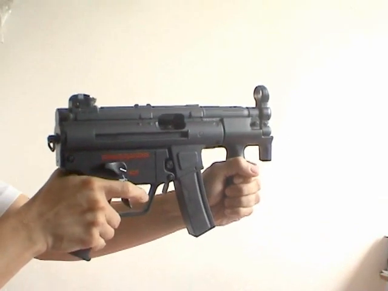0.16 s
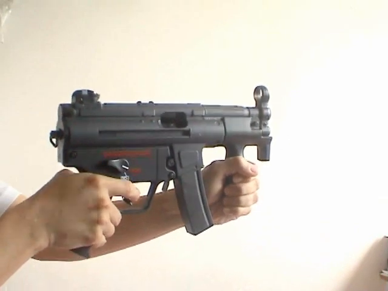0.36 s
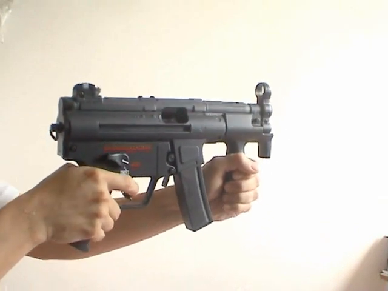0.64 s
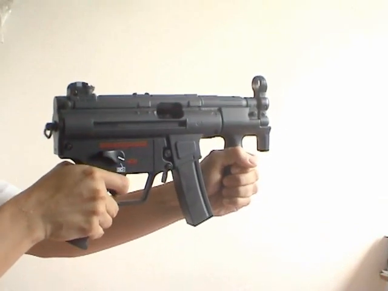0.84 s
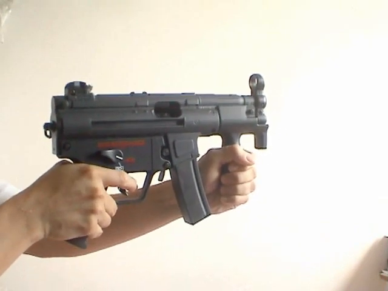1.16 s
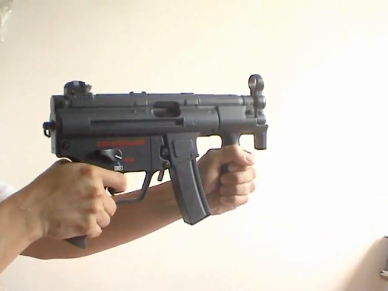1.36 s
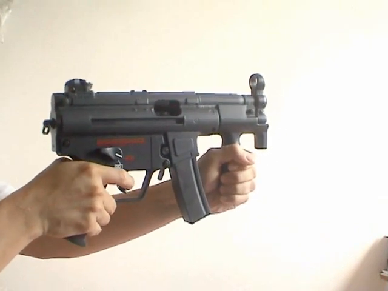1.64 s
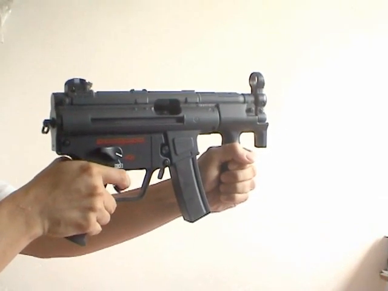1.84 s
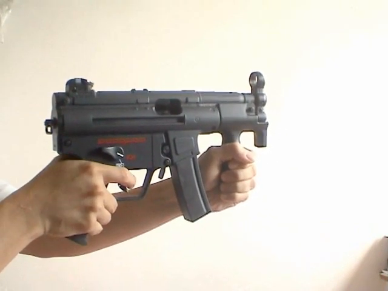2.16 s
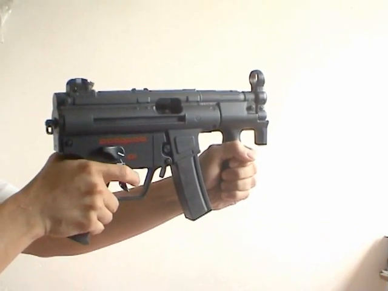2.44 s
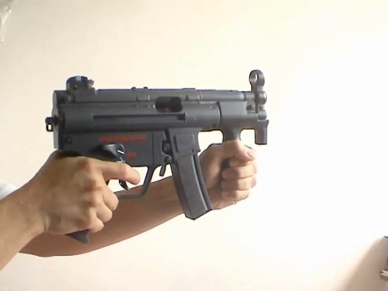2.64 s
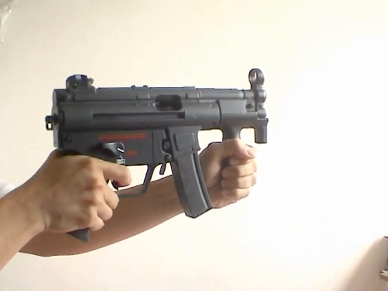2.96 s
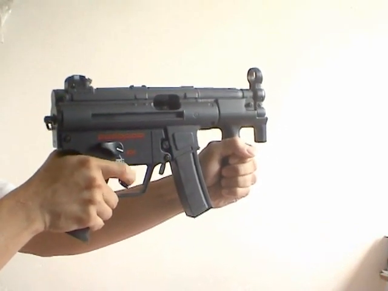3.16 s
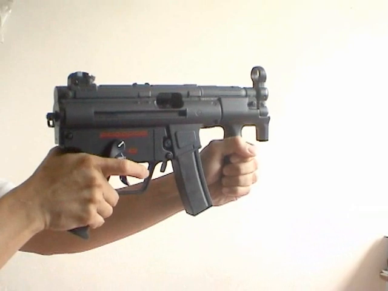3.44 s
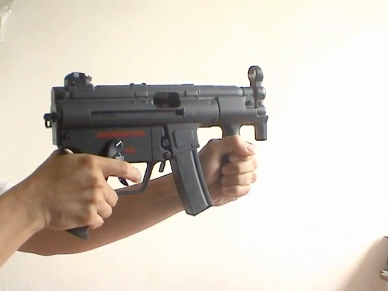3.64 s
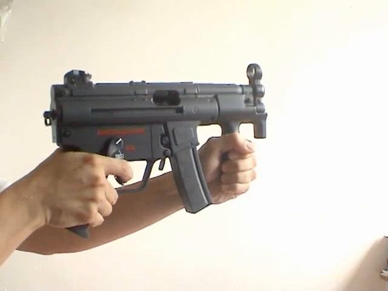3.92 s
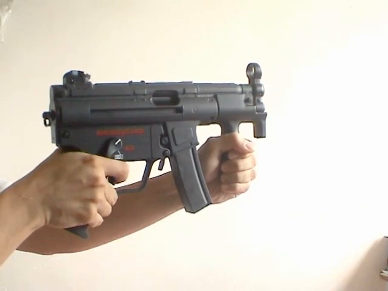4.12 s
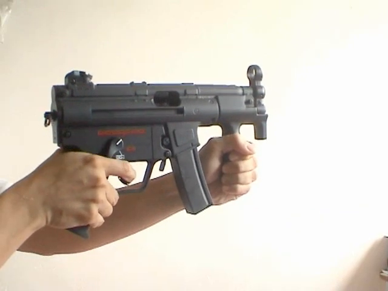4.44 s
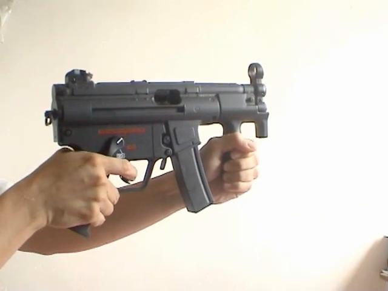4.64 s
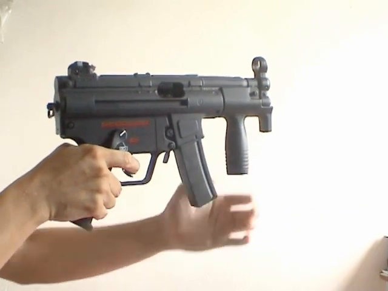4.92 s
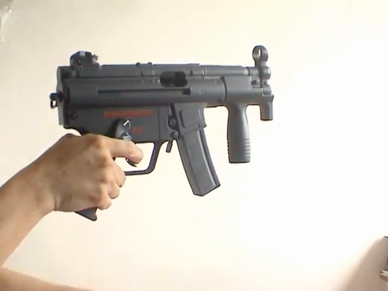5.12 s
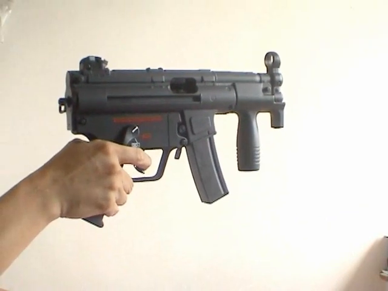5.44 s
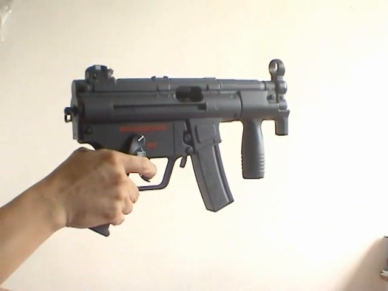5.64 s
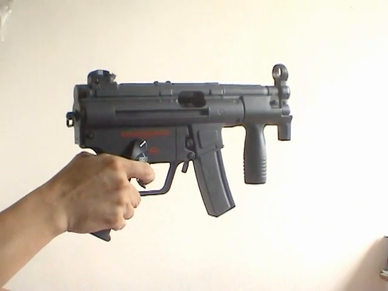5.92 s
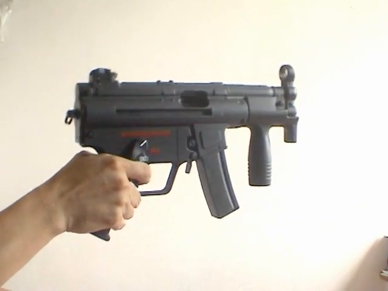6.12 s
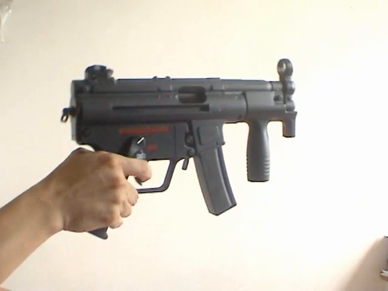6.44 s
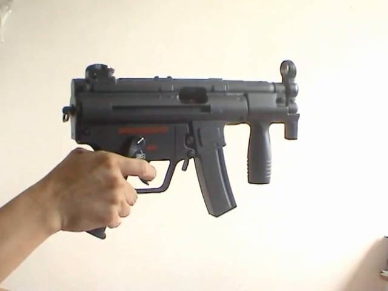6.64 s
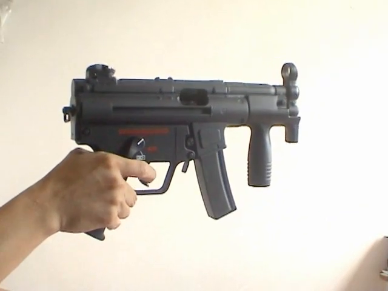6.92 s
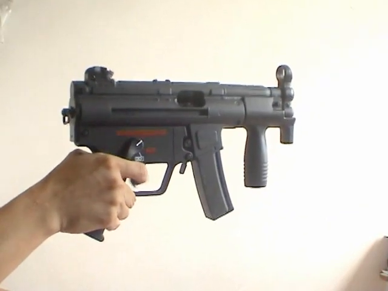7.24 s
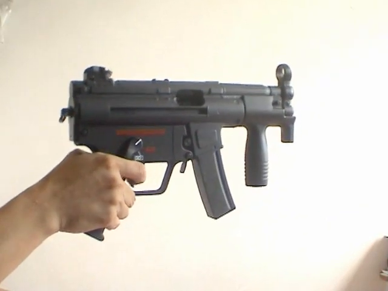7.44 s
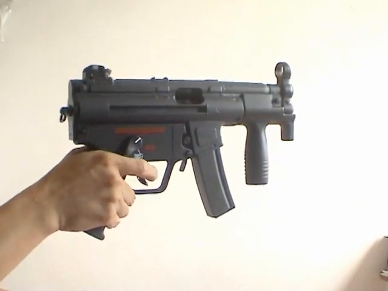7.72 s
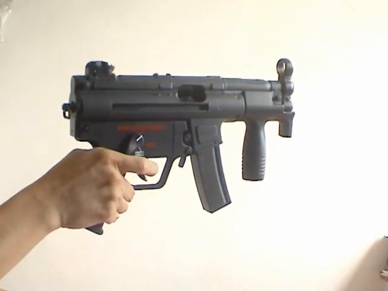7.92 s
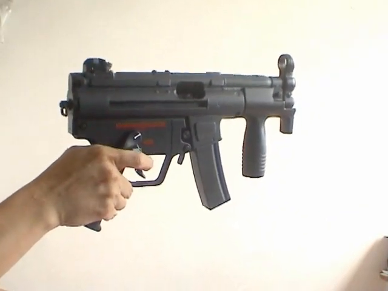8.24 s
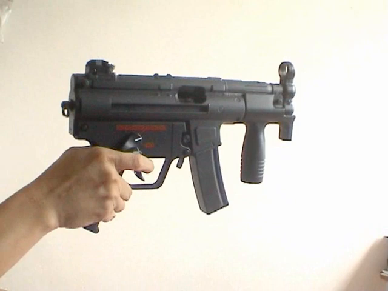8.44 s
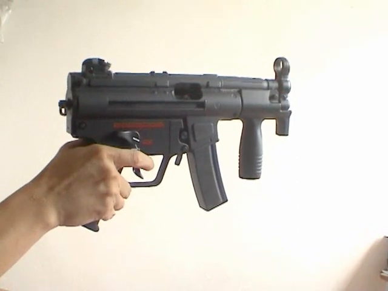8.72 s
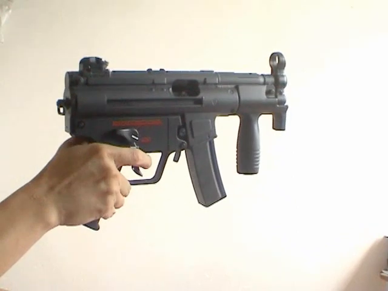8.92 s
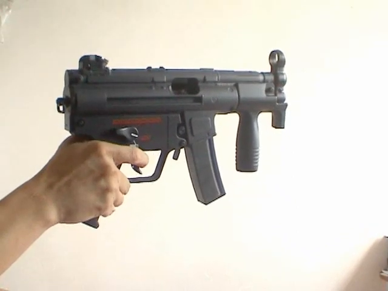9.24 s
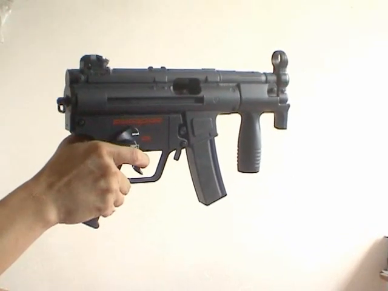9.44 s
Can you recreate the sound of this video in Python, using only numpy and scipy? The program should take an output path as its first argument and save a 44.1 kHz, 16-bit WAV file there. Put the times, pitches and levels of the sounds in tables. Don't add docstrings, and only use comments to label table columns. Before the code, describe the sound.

A gas-powered replica gun snaps four separate sharp shots, then three rapid automatic bursts, with plastic clicks between, over a low room drone.

```python
import sys
import numpy as np
from scipy import signal
from scipy.fft import rfft, irfft, next_fast_len
from scipy.io import wavfile
from scipy.ndimage import uniform_filter1d

SR = 44100
rng = np.random.default_rng(int(sys.argv[2]) if len(sys.argv) > 2 else 0)


def gain_from_decibels(decibels):
    exponent = np.asarray(decibels, float) / 20
    return 10 ** exponent


def materialize(psi):
    bounded = np.clip(np.atleast_2d(psi).T, -1, 1)
    quanta = np.round(bounded * 32767).astype(np.int16)
    wavfile.write(sys.argv[1], SR, quanta)


N = 422037
TIME = np.arange(N) / SR

# (frequency [Hz], density [dB per Hz])
AIR_SPECTRUM = [(12, -38), (24, -7), (60, -6), (130, -4.5), (240, -3), (370, -3.5), (660, -5), (1090, -10),
                (1600, -12), (3000, -19), (4050, -22.5), (4500, -27.5), (8000, -33.5), (14500, -41)]
# (frequency [Hz], width [Hz], level [dB])
HUM_BANDS = [(132, 22, 0.5), (325.7, 3.2, -2.5)]
# (frequency [Hz], level re air [dB])
WHINE_TONES = [(7800, -35), (13410, -40)]
# (time [s], length [s], level before gain control [dB])
MOTOR_SWELLS = [(.34, 0.06, -43), (2.64, 0.045, -47), (5.58, 0.07, -37), (6.02, 0.12, -32),
                (7.9, 0.14, -34), (8.31, 0.055, -32.5), (8.554, 0.058, -34.5), (9.46, 0.15, -39)]
# (time [s], level [dB])
TRIGGER_CLICKS = [(.6394, -37.5), (.846, -32.5), (0.879, -24), (1.4067, -26), (1.4262, -25),
                  (1.8015, -18.5), (2.7574, -44.5), (3.0143, -22.5), (3.033, -22.5), (3.9998, -32.5),
                  (6.0553, -32), (7.312, -44), (7.3484, -43.5), (9.442, -48)]
# (top re middle [dB], tail [dB], latch ring [dB])
TRIGGER_TONE = (-20, -9, -18)
# (time [s], level [dB], top re middle [dB], tail [dB], latch ring [dB])
SELECTOR_SNAPS = [
    (0.0572, -4.5, 0.5, -10, -24),
    (3.4752, -22.5, -14.5, -11.5, -23.5),
    (3.4814, -28.5, -7, -4.5, -16),
    (3.5144, -9.5, 5.5, -9.5, -19),
    (3.5185, -6.5, -17, -9.5, -12.5),
    (8.6872, -26.5, -5.5, -11, -19),
    (8.6902, -27.5, 0.5, -10.5, -17.5),
    (8.7134, -29.5, 7, -25.5, -19.5),
    (8.721, -29, 2.3, -4.5, -16),
]
# (frequency [Hz], level [dB], t60 [s])
LATCH_MODES = [(1217, -5, 0.14), (2310, -8, 0.021), (2600, -2, 0.028), (2860, -5, 0.22), (3210, -3, 0.081),
               (3980, -10.5, 0.17)]
# (time [s], frequency [Hz], level [dB], t60 [s])
KNOCKS = [(.0578, 1600, -11.5, 0.079), (8.688, 640, -36.5, 0.12), (8.701, 960, -40.5, 0.14),
          (8.724, 870, -43, 0.12), (8.6905, 2400, -35.5, .02), (3.5187, 2600, -4.5, .03),
          (3.532, 2900, -21, 0.046)]
# (valve opens [s], first thump [s], last thump [s])
PULLS = [
    (0.9341, 0.9578, 0.9578),
    (1.4887, 1.5122, 1.5122),
    (1.8649, 1.8886, 1.8886),
    (3.0995, 3.1237, 3.1237),
    (4.2395, 4.2624, 4.5213),
    (6.1072, 6.1311, 6.5761),
    (7.387, 7.411, 7.6335),
]
# (limited jet [dB], excess over limiter at last round [dB], hammer and valve [dB])
PULL_FORCE = [(-12.5, 15.5, 0.5), (-13, 14.5, -0.7), (-13.5, 13.5, 1.5), (-13.5, 14, -1), (-12, 7, -2.5),
              (-9.5, -2, -5.5), (-7.5, -6.5, -7)]
# (level [dB], lift at first thump [dB], extra fall [dB/s], dullness of first rush [dB])
LAYERS = [(0.3, 2.8, -3.4, 0.5), (-5, 3, 11.5, -6), (-1.5, -2, 12.5, -6.5), (-5, 4, 8.5, 3.5)]
# (frequency [Hz], density [dB per Hz])
BODY_SPECTRUM = [(90, -31), (135, -12.5), (165, -21.5), (210, -17), (320, -13.5), (431, -7.5), (549, -9),
                 (620, -7), (862, -4.5), (1100, -7), (1490, -6), (1800, -13.5), (2340, -41), (3960, -90.5)]
# (frequency [Hz], level [dB], t60 [s])
ROOM_MODES = [(217.8, -14.5, 0.23), (263.9, -10.5, 0.29), (279.4, -12, 0.35), (429, -13.5, 0.29),
              (476.3, 0.5, 0.13), (583, -9.5, 0.21), (729.2, -8, 0.38), (830, -14, 0.07),
              (847.5, -3.5, 0.38), (917, -1, 0.18), (1085, 0.5, 0.18), (1437, -6, .2)]
# (frequency [Hz], level [dB], t60 [s])
SLIDE_MODES = [(2940, -39.5, .3), (3020, -36, .35), (3360, -29.5, .25), (6400, -42, .25), (7950, -35, .4)]
# (frequency [Hz], density [dB per Hz])
GAS_SPECTRUM = [(710, -29), (1200, -4.5), (1400, 3.5), (1490, -9), (1860, 0.5), (2110, 1), (2290, 1.5),
                (2910, 0), (3300, 3), (3630, 2), (4610, -1), (8100, -1), (12800, -9.5), (13800, -13.5),
                (14500, -33.5)]
# (time after thump [s], level [dB])
JET_CYCLE = [(0, -2), (.002, 10), (.006, -13), (.009, 5.5), (.014, -1), (.019, -1.5), (.027, -0.5),
             (.037, 3.5)]
# (frequency [Hz], level [dB])
PORT_LEFT_DB = [(60, 7), (110, 10), (200, 7), (370, 7.5), (680, 4), (1250, 3), (2280, 1), (4190, -0.5),
                (7680, 0), (14100, 0.5)]
# (frequency [Hz], phase [rad])
PORT_LEAD_RAD = [(60, .1), (400, 0.45), (1200, 0.64), (3700, 0.36), (9000, 0.11)]
# (frequency [Hz], correlation [0-1])
PORT_ALIKE = [(60, 1), (130, 0.94), (290, 1), (620, 0.87), (1360, 0.71), (2960, 0.77), (6460, 0.63),
              (14100, 0.033)]

JET_MIDDLE, LOW_BODY, JET_TOP, UPPER_BODY = range(4)
AIR_DB, AIR_FADE_DB_PER_S, AIR_STEADY_S = -32, 0.63, 5.2
MOTOR_HZ, MOTOR_DB, THROB_DB = 80.2, -45, 3
SENSOR_DB = -71
CLICK_T60_S = 0.22
CYCLE_S, HURRY_S = .0371, .0007
UNLOCK_S, VENT_S = .0138, 0.018
CRACK_DB, RUSH_DB, HAMMER_DB = -6.5, -3.5, -19
THUMP_DB, FIRST_THUMP_DB, THUMP_SCATTER_DB = -4.5, -4, 0.1
SAG_DB_PER_S, SETTLE_DB, SETTLE_S, LIFT_S = 0.5, 1.5, .08, 0.014
ROOM_FALL_DB_PER_S, KNEE_DB = 178, 8
SINK_DB_PER_S = 59.5
LATE_DB, LATE_FALL_DB_PER_S = -42.5, 90.5
BOTTOM_DB, PULL_SHARE, WAIT_S, CREEP_DB_PER_S = -34, 0.033, 0.26, 4


def along(table, hz):
    f, v = np.transpose(table)
    return np.interp(np.log(hz + 1), np.log(f), v)


def colour(x, table):
    n = next_fast_len(x.shape[-1], True)
    hz = np.arange(n // 2 + 1) * SR / n
    y = irfft(rfft(x, n) * gain_from_decibels(along(table, hz)), n)[:, :x.shape[-1]]
    return y / np.sqrt(np.mean(y ** 2))


def band(x, lo_hz, hi_hz):
    sos = signal.butter(2, [lo_hz, min(hi_hz, SR / 2.2)], "band", fs=SR, output="sos")
    return signal.sosfilt(sos, x)


def split(x, hz):
    n = next_fast_len(x.shape[-1], True)
    ratio = np.arange(n // 2 + 1) * SR / n / hz
    low = irfft(rfft(x, n) / (1 + ratio ** 4), n)[:, :x.shape[-1]]
    return low, x - low


def fade(t, t60):
    return np.exp(-np.log(1000) * t / t60)


def walk(rate_hz):
    k = int(SR / rate_hz)
    steps = np.repeat(rng.standard_normal(N // k + 1), k)
    return 0.64 * uniform_filter1d(uniform_filter1d(steps, k), k)[:N]


def add(out, s, sound):
    i = int(s * SR)
    out[:, i:i + sound.shape[1]] += sound[:, :N - i]


def thumps(first_s, last_s):
    count = round((last_s - first_s) / CYCLE_S) + 1
    return np.append(first_s, np.linspace(first_s - HURRY_S, last_s, count)[1:])


def gain_db():
    t = np.arange(0, N / SR, .001)
    db = np.zeros(len(t))
    for _, first_s, last_s in PULLS:
        i = int(first_s * 1000)
        rounds = np.clip((t[i:] - first_s) / CYCLE_S, 0, (last_s - first_s) / CYCLE_S + 1)
        sunk = BOTTOM_DB + (db[i] - BOTTOM_DB) * (1 - PULL_SHARE) ** rounds
        creep = CREEP_DB_PER_S * np.maximum(t[i:] - last_s - WAIT_S, 0)
        db[i:] = np.minimum(sunk + creep, 0)
    return np.interp(TIME, t, db)


def heard(layer):
    gain, slow_db = np.zeros(N), gain_db()
    layer_db, lift_db, fall_db, dull_db = LAYERS[layer]
    for (open_s, first_s, last_s), (jet_db, excess_db, valve_db) in zip(PULLS, PULL_FORCE):
        on = slice(int(open_s * SR), int((last_s + .6) * SR))
        t = TIME[on] - first_s
        after = np.maximum(TIME[on] - last_s - VENT_S, 0)
        settled = 1 - np.exp(-np.maximum(t, 0) / SETTLE_S)
        held = jet_db - SAG_DB_PER_S * t - SETTLE_DB * settled
        fall_rate = ROOM_FALL_DB_PER_S + SINK_DB_PER_S * min((last_s - first_s) / 0.43, 1)
        db = held - KNEE_DB * np.log10(1 + 10 ** ((fall_rate * after - excess_db) / KNEE_DB))
        late_db = held + LATE_DB - LATE_FALL_DB_PER_S * (after - .2)
        db = 10 * np.log10(10 ** (db / 10) + 10 ** (late_db / 10) * (after > .1))
        db += layer_db - fall_db * after + lift_db * np.exp(-(t / LIFT_S) ** 2)
        early = open_s + UNLOCK_S - TIME[on]
        rush_db = RUSH_DB + valve_db + 0.61 * slow_db[on.start] + dull_db
        db += (early > 0) * rush_db * np.clip(early / 0.0041, .4, 1)
        gain[on] = np.maximum(gain[on], gain_from_decibels(db))
    return gain


def drone():
    rumble, hiss = split(colour(rng.standard_normal((2, N)), AIR_SPECTRUM), 600)
    air = rumble * gain_from_decibels(1.3 * walk(4.3)) + hiss * gain_from_decibels(0.42 * walk(15))
    sway = walk(8)
    for hz, db in WHINE_TONES:
        air += gain_from_decibels(db + 2.2 * sway) * np.sin(2 * np.pi * hz * TIME + 4 * sway)
    for hz, width, db in HUM_BANDS:
        hum = band(rng.standard_normal((2, N)), hz - width / 2, hz + width / 2)
        air += gain_from_decibels(db - 12) * np.sqrt(SR / width) * hum
    motor = np.sin(2 * np.pi * MOTOR_HZ * TIME + 2.1 * walk(5)) * gain_from_decibels(1.2 * walk(7.3))
    motor = motor * np.array([[1], [.3]])
    throb = gain_from_decibels(MOTOR_DB + THROB_DB * walk(20))
    for s, length_s, db in MOTOR_SWELLS:
        throb += gain_from_decibels(db) * np.exp(-((TIME - s) / length_s) ** 2)
    duck = 1 / (1 + 6 * uniform_filter1d(heard(JET_MIDDLE), size=2000))
    air_gain = gain_from_decibels(AIR_DB - AIR_FADE_DB_PER_S * np.minimum(TIME, AIR_STEADY_S))
    return (duck * air * air_gain + motor * throb) * gain_from_decibels(gain_db())


def clicks():
    out, t = np.zeros((2, N)), np.arange(int(.25 * SR)) / SR
    snap = fade(t, .01) * np.minimum(t / 0.00042, 1) * np.array([[1], [.3]])
    tail = fade(t, CLICK_T60_S) * np.minimum(t / .004, 1)
    events = [*SELECTOR_SNAPS, *((*row, *TRIGGER_TONE) for row in TRIGGER_CLICKS)]
    for s, db, top_db, tail_db, ring_db in events:
        noise = rng.standard_normal((2, len(t)))
        middle, top = split(band(band(noise, 900, 12000), 500, 12000), 6000)
        ring = np.zeros(len(t))
        for hz, mode_db, t60 in LATCH_MODES:
            louder, sharper = rng.standard_normal(2)
            tone = np.sin(2 * np.pi * hz * (1 + .02 * sharper) * t)
            ring += gain_from_decibels(mode_db + louder) * fade(t, t60) * tone
        ring *= 1 + uniform_filter1d(noise[0], size=60) * np.sqrt(60)
        click = (middle + gain_from_decibels(top_db + 2) * top) * (snap + gain_from_decibels(tail_db) * tail)
        add(out, s, gain_from_decibels(db + 3.5) * (click + gain_from_decibels(ring_db) * ring))
    for s, hz, db, t60 in KNOCKS:
        add(out, s, gain_from_decibels(db) * fade(t, t60) * np.sin(2 * np.pi * hz * t) * np.array([[1], [.3]]))
    return out


def valves():
    size = 780
    out, t, slow_db = np.zeros((2, N)), np.arange(size) / SR, gain_db()
    for (s, *_), (*_, valve_db) in zip(PULLS, PULL_FORCE):
        db = slow_db[int(s * SR)] + valve_db
        rattle = band(rng.standard_normal((2, size)), 500, 3200)
        rattle *= gain_from_decibels(1.5 * rng.standard_normal(13)).repeat(60)
        hammer = rattle * fade(t, .06) * np.minimum(t / 0.0017, 1)
        add(out, s - size / SR, gain_from_decibels(HAMMER_DB + db + 9.5) * hammer)
        frame = band(rattle, 550, 1500) * 2 + 0.7 * rattle
        add(out, s - size / SR, frame * gain_from_decibels(HAMMER_DB + db - 5 + 750 * t))
        ring = band(rng.standard_normal(size), 3000, 3400) * 3
        ring += band(rng.standard_normal(size), 4400, 7500)
        add(out, s, gain_from_decibels(CRACK_DB + db + 11) * fade(t, 0.025) * np.array([ring, 0 * ring]))
    return out


def bolt_kicks():
    kicks = np.zeros(N)
    for open_s, first_s, last_s in PULLS:
        for s in np.append(thumps(first_s, last_s), open_s):
            late, size = rng.standard_normal(2)
            kicks[int((s + .00008 * late) * SR)] = gain_from_decibels(.8 * size)
    return kicks


def clatter(kicks, t):
    walls = colour(rng.standard_normal((2, len(t))), BODY_SPECTRUM)
    walls *= fade(t, .6) * np.minimum(t / .012, 1)
    for hz, db, t60 in ROOM_MODES:
        tone = np.sin(2 * np.pi * (hz * t + rng.random((2, 1))))
        walls += gain_from_decibels(db - 1) * fade(t, t60) * tone
    x = signal.fftconvolve(kicks[None], walls)[:, :N]
    x /= np.sqrt(abs(uniform_filter1d(x[0] ** 2, size=1640)) + 1e-9)
    x += gain_from_decibels(-10) * colour(rng.standard_normal((2, N)), BODY_SPECTRUM)
    low, high = split(x, 850)
    return low * heard(LOW_BODY) * gain_from_decibels(2.5) + high * heard(UPPER_BODY) * gain_from_decibels(1.5)


def bolt_pushes(t):
    out = np.zeros((2, N))
    turns = (t[:240] - 120 / SR) * 900
    push = np.cos(2 * np.pi * turns + 0.68) * np.exp(-(turns / .65) ** 2)
    for _, first_s, last_s in PULLS:
        for s in thumps(first_s, last_s):
            db = THUMP_DB if s > first_s else FIRST_THUMP_DB
            db += THUMP_SCATTER_DB * rng.standard_normal()
            add(out, s - 130 / SR, gain_from_decibels(db + 5) * np.array([push, 0 * push]))
            add(out, s + .0117, gain_from_decibels(db - 9.5) * np.array([push, 0.54 * push]))
    return out


def slide_ring(kicks, t):
    ring = sum(gain_from_decibels(db) * fade(t, t60) * np.sin(2 * np.pi * hz * t) for hz, db, t60 in SLIDE_MODES)
    struck = signal.fftconvolve(kicks * gain_from_decibels(5 * walk(40)), ring)[:N]
    return struck * gain_from_decibels(3.5) * np.array([[1], [.4]])


def body():
    t, kicks = np.arange(int(.45 * SR)) / SR, bolt_kicks()
    return clatter(kicks, t) + bolt_pushes(t) + slide_ring(kicks, t)


def gas():
    beats = np.concatenate([thumps(first_s, last_s) for _, first_s, last_s in PULLS])
    since = TIME - beats[np.maximum(np.searchsorted(beats, TIME) - 1, 0)]
    throb_db = np.interp(since, *np.transpose(JET_CYCLE))
    throb_db = np.where((since > 0) & (since < .04), throb_db, 0)
    middle, top = split(colour(rng.standard_normal((2, N)), GAS_SPECTRUM), 6000)
    middle *= gain_from_decibels(0.3 * throb_db + walk(250) + 3) * heard(JET_MIDDLE)
    top *= gain_from_decibels(0.37 * throb_db + 0.79 * walk(300) + 7.5) * heard(JET_TOP)
    return middle + top


def scene():
    n = next_fast_len(N, True)
    shared, other = rfft(drone() + clicks() + valves() + body() + gas(), n)
    hz = np.arange(n // 2 + 1) * SR / n
    alike = np.clip(along(PORT_ALIKE, hz), 0, 1)
    mid, side = shared * np.sqrt((1 + alike) / 2), other * np.sqrt((1 - alike) / 2)
    tilt = gain_from_decibels(along(PORT_LEFT_DB, hz) / 2) * np.exp(.5j * along(PORT_LEAD_RAD, hz))
    return gain_from_decibels(0.39) * irfft(np.array([(mid + side) * tilt, (mid - side) / tilt]), n)[:, :N]


def low_pass(x):
    return signal.sosfilt(signal.butter(12, 14690, fs=SR, output="sos"), x)


def record(dry):
    hiss = gain_from_decibels(SENSOR_DB) * band(rng.standard_normal((2, N)), 3000, 14000)
    top_cut = signal.ellip(6, .3, 45, 14300, fs=SR, output="sos")
    return low_pass(np.clip(signal.sosfilt(top_cut, dry + hiss), -1, 1))


dry = scene()
out = record(dry)
materialize(out)
```